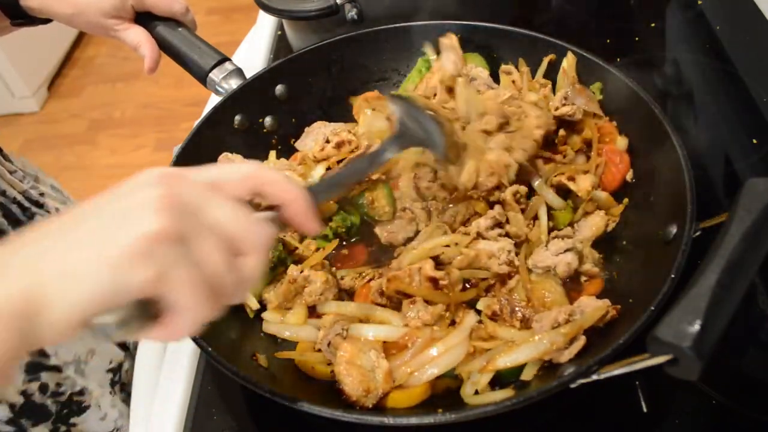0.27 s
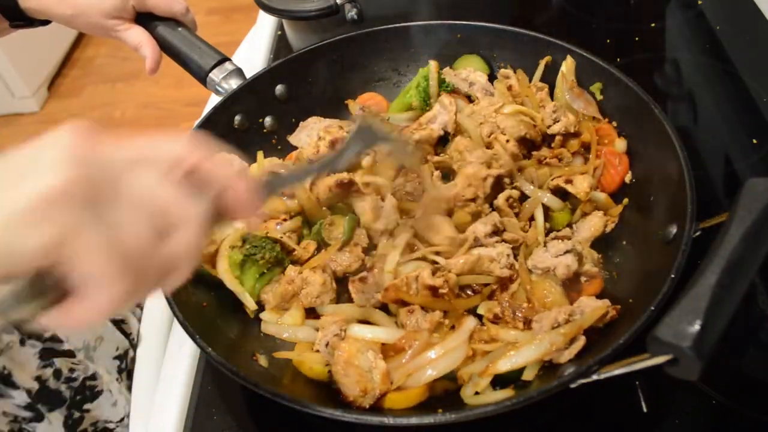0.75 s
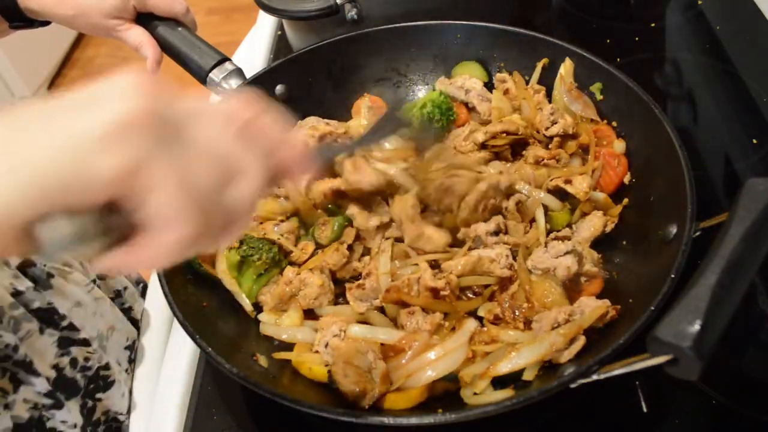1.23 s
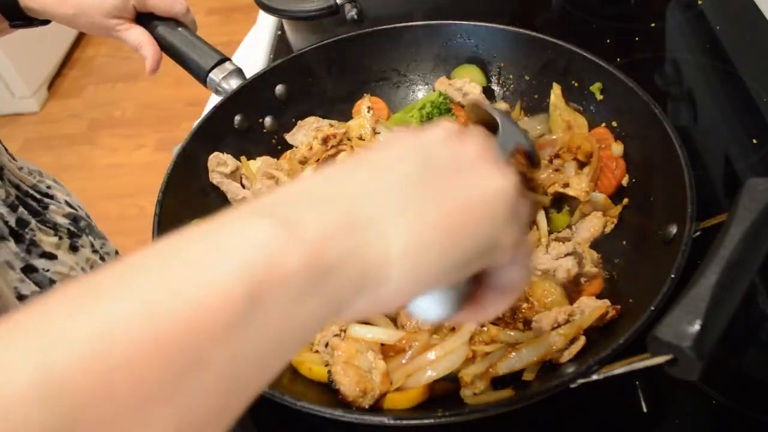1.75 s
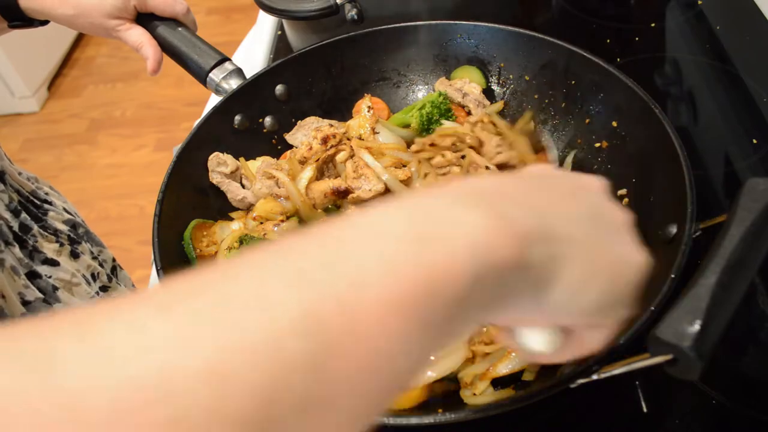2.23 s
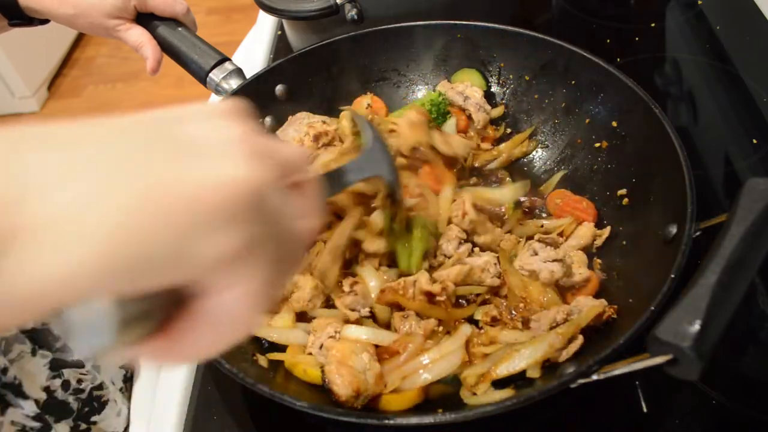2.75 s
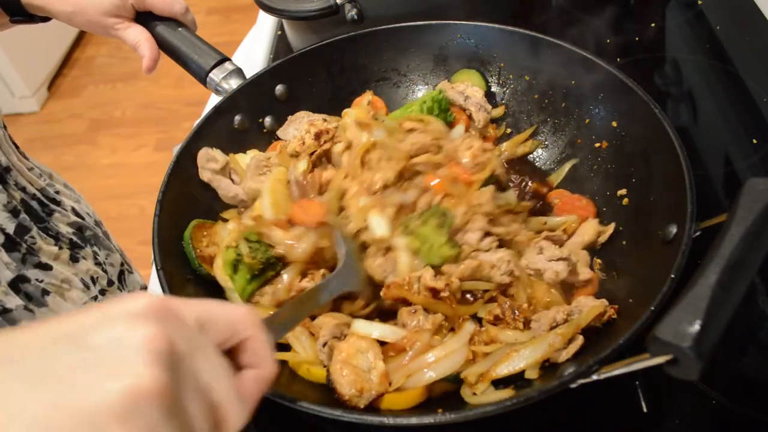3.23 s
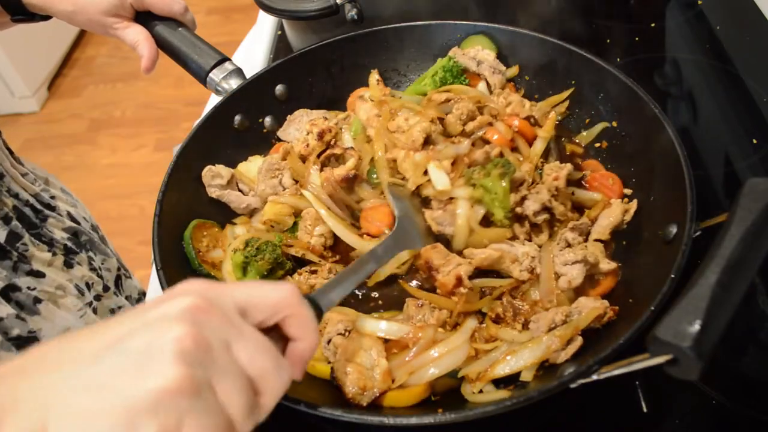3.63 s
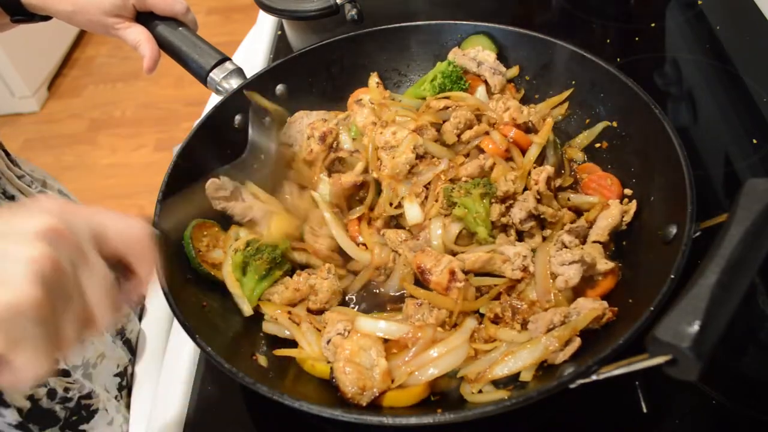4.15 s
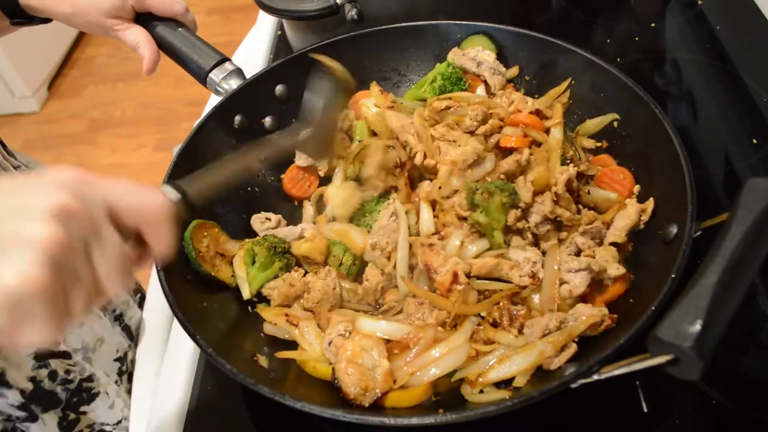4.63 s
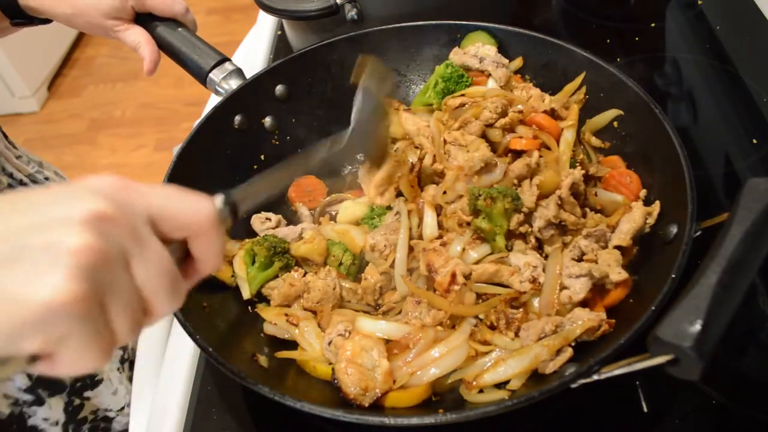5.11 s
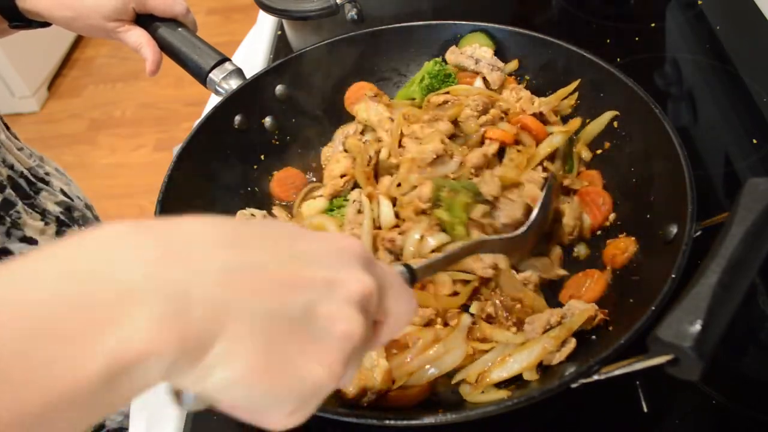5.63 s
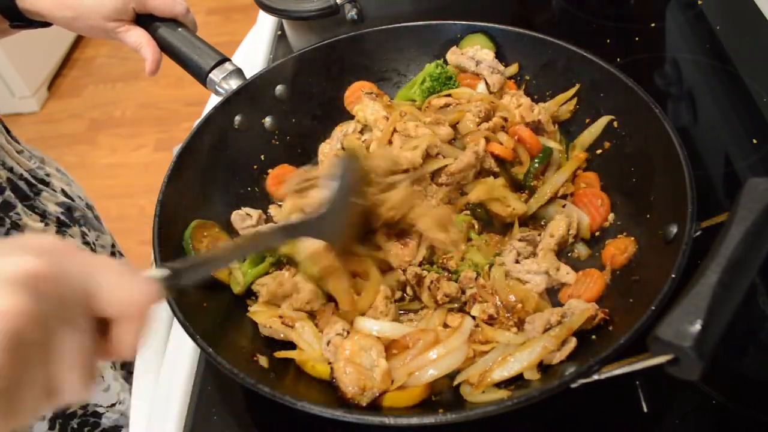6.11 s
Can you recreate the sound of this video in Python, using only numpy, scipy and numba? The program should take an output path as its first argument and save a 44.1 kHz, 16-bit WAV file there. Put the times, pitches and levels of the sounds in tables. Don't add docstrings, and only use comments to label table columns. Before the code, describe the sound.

Continuous moist frying sizzle, centred and near, full of tiny bubble bursts. First pops and a quick chirring train of steam puffs, then a metal clack joined to a short squealing, gritty scrape. Gentler bubbling returns before one piercing, short-ringing clank, followed by a quieter simmer with crisp spits, hissing puffs and soft pan thuds. Small room echo, low mains hum and light microphone hiss.

```python
import sys
import numpy as np
from scipy import signal
from scipy.fft import rfft, irfft, next_fast_len
from scipy.io import wavfile
from scipy.ndimage import uniform_filter1d
from numba import njit

SR = 44100
rng = np.random.default_rng(int(sys.argv[2]) if len(sys.argv) > 2 else 0)


def put_to_file(sound):
    columns = np.atleast_2d(sound).T
    safe = np.clip(columns, -1, 1)
    whole_steps = np.round(safe * 32767)
    wavfile.write(sys.argv[1], SR, whole_steps.astype(np.int16))


def attenuation_scalar(level_db):
    decades = np.asarray(level_db, float) / 20
    return 10 ** decades


N = 280917


def level(x, db):
    return x * attenuation_scalar(db) / np.sqrt(np.mean(x ** 2))


def curve(rows):
    s, *columns = np.transpose(rows)
    return [np.interp(np.arange(N) / SR, s, c) for c in columns]


def colour(x, points):
    hz, db = np.transpose(points)
    size = next_fast_len(len(x))
    f = np.maximum(np.arange(size // 2 + 1) * SR / size, 1)
    gain = attenuation_scalar(np.interp(np.log(f), np.log(hz), db))
    return irfft(rfft(x, size) * gain, size)[:len(x)]


def band(x, lo_hz, hi_hz):
    return signal.sosfilt(signal.butter(3, [lo_hz, hi_hz], "band", fs=SR, output="sos"), x)


def even_out(x, samples, floor=0.0):
    return x / np.sqrt(uniform_filter1d(x ** 2, size=samples) + floor)


def walk(rate):
    k = int(SR / rate)
    steps = np.repeat(rng.standard_normal(N // k + 1), k)
    return 1.3 * uniform_filter1d(uniform_filter1d(steps, k), k)[:N]


def mode(x, hz, t60):
    r = np.exp(-np.log(1000) / (t60 * SR))
    w = 2 * np.pi * hz / SR
    return signal.lfilter([1, -1], [1, -2 * r * np.cos(w), r * r], x) * np.cos(w / 2)


def resonate(x, peaks, widen, between_db, wander_db):
    outline = [(hz, db) for hz, _, db in peaks] + [(17000, peaks[-1][2] - 20)]
    between = level(colour(x, outline), between_db)
    sound = 0
    for hz, width_hz, db in peaks:
        push = x * attenuation_scalar(wander_db * walk(35)[:len(x)])
        ring = mode(push, hz, 2.2 / (widen * width_hz))
        sound = sound + level(ring, db) * np.sqrt(width_hz)
    return level(sound, 0) + between


@njit
def grains(count, start, step, cycles, size, glide):
    out = np.zeros(count)
    for g in range(len(start)):
        u, phase, i = 0., 0., int(start[g])
        while u < 8 and i < count:
            out[i] += size[g] * 2.72 * u * np.exp(-u) * np.sin(phase)
            phase += step[g] * (1 + glide * u)
            u += step[g] / (2 * cycles)
            i += 1
    return out


def bursts(table, cycles, trim_db, spray_db, snap_db=-2.0):
    s, db, hz = np.transpose(table)
    step, size = 2 * np.pi * hz / SR, attenuation_scalar(db + trim_db)
    ring = grains(N, s * SR, step, cycles, size, 0.0011)
    snap = grains(N, s * SR, 0.59 * step, cycles / 2.76, size * attenuation_scalar(snap_db), 0.08)
    out = ring + snap
    for _ in range(4):
        late, pitch = rng.random((2, len(s)))
        start = s * SR + (2 + 14 * late) * 2 * np.pi / step
        drop = size * attenuation_scalar(spray_db - 2.9 * late)
        out = out + grains(N, start, step * (.75 + .5 * pitch), cycles, drop, .01)
    return out


# start_s, heat_db, pooling [0-1]
HEAT = [(0.0, -1, 0.5), (0.3, -0.5, .3), (0.55, 3, 0.5), (0.8, -2, 0.3), (1.244, -2, 0.9), (1.97, 0, 0.5),
        (2.32, -0.5, 0.8), (2.8, -4, 0.9), (3.07, 0, 0.7), (3.3, 0.5, 0.57), (3.644, -2.5, 0.34),
        (4.05, -1.5, 0.6), (4.2, 1.5, 0), (4.4, -3, 0.75), (5.08, -11, 0.3), (5.3, -5.5, 0.9),
        (5.55, -4, 0.44), (6.37, -4, 0.66)]
# lowest_hz, highest_hz, rate [bursts per s], ring [cycles], size_spread_db, trim_db
BUBBLE_KINDS = [
    (4300, 10500, 1800, 2.0, 2.8, -2),
    (2300, 3900, 900, 3.0, 2.3, -1),
    (1250, 2400, 700, 2.5, 1.9, -1),
    (250, 900, 600, 2.5, 1.5, -3),
]
WHISTLE_BUBBLES = (6381, 7400, 1494, 2.5, 5, -4.5)
SPATTER_DROPS = (3800, 8200, 61, 2.5, -0.5, -8.5)
CHIRRING_VENTS = (2641, 3096, 258, 8, 3, -6.5)
# level_db, follow [dB per dB of heat], pooled_db
BOIL_RESPONSE = [
    (-51.5, 0.49, -1.5),
    (-48.5, 1.0, -3.5),
    (-56.5, 1.5, 8),
    (-55, 0.54, 2),
]


def simmer():
    heat, pool = curve(HEAT)
    fizz, vents, plops, thumps = [db + follow * heat + pooled_db * pool for db, follow, pooled_db in BOIL_RESPONSE]
    strengths = [fizz, vents, plops, thumps, fizz, fizz, vents]
    kinds = [*BUBBLE_KINDS, WHISTLE_BUBBLES, SPATTER_DROPS, CHIRRING_VENTS]
    out = 0
    for db, (lo_hz, hi_hz, rate, cycles, spread_db, trim_db) in zip(strengths, kinds):
        when, pitch, big = rng.random((3, int(rate * N / SR)))
        step = 2 * np.pi * lo_hz * (hi_hz / lo_hz) ** pitch / SR
        size = attenuation_scalar(-spread_db * np.log(1 - .995 * big))
        swarm = grains(N, when * N, step, float(cycles), size, 0.028)
        out = out + level(swarm, trim_db) * attenuation_scalar(db + walk(14))
    return out


# pitch_hz, level_db [rms]
MAINS = [(60, -57), (120, -66.5)]


def hum():
    t = np.arange(N) / SR
    return sum(np.sqrt(2) * attenuation_scalar(db + 0.43 * walk(2.81)) * np.sin(2 * np.pi * hz * t) for hz, db in MAINS)


# pitch_hz, level_db [per Hz]
AIR_TONE = [(15, -34), (25, -11), (59, -5.5), (195, -5), (384, -10), (427, -6.5), (607, -5.5), (962, -8),
            (2160, -13.5), (3920, -12.5), (10700, -19.5), (14400, -16), (16000, -19.5)]


def air():
    return level(colour(rng.standard_normal(N), AIR_TONE), -49.5)


def kitchen(x):
    t60_s, mid_db, side_db = 0.72, -24, -56
    t = np.arange(SR // 2) / SR
    fade = attenuation_scalar(-60 * t / t60_s) * np.clip((t - .004) / 0.0009, 0, 1)
    tails = rng.standard_normal((2, len(t))) * fade
    dull = signal.lfilter([.6], [1, -.4], tails)
    mid, side = (signal.fftconvolve(x, level(h, 0) / np.sqrt(len(t)))[:N] for h in dull)
    return attenuation_scalar(mid_db) * mid, attenuation_scalar(side_db) * side


# start_s, peak_db, pitch_hz
LOW_PLOPS = [(0.028, -28.5, 1730), (0.086, -27.5, 1190), (0.122, -31, 1670), (0.14, -31.5, 1220),
             (0.171, -32, 810), (0.304, -32, 1315), (0.502, -29, 1157), (0.95, -27, 2270),
             (1.395, -32.5, 1510), (1.604, -31, 1730), (2.766, -32, 1780), (2.785, -27, 1520),
             (2.881, -30.5, 1500), (2.918, -28.5, 1320), (2.964, -29, 1400), (2.998, -28.5, 1890),
             (3.072, -36, 1970), (3.145, -28, 1740), (3.551, -31.5, 1650), (3.61, -32.5, 1580),
             (3.645, -31.5, 1670), (3.728, -29, 1600), (3.758, -31, 1600), (3.839, -32, 1650),
             (3.892, -32.5, 2080), (3.962, -31, 1660), (6.205, -34.5, 950)]
# start_s, peak_db, pitch_hz
BRIGHT_POPS = [(0.0278, -29, 2850), (0.0861, -28, 2670), (0.1404, -26, 2970), (0.171, -30, 2900),
               (0.2536, -31.5, 3280), (0.3693, -32.5, 3050), (0.393, -28, 3850), (0.4322, -31, 2820),
               (0.5048, -31, 3100), (0.734, -28.5, 3050), (0.9364, -29, 2820), (0.9514, -19.5, 2460),
               (0.9564, -22, 3570), (0.9649, -21.5, 3070), (0.9784, -31, 3310), (1.2064, -22.5, 2800),
               (1.94, -31, 2900), (2.453, -42, 3200), (2.4776, -24.5, 3660), (2.821, -34, 2320),
               (2.863, -37, 3800), (3.013, -39, 2180), (3.047, -34, 2180), (4.0757, -18, 2430),
               (4.0792, -16.5, 1700), (4.0815, -11, 3880), (4.0875, -32, 1730), (4.093, -28, 4200),
               (2.8489, -26, 2680), (2.9642, -31, 2550), (3.1915, -31, 3240), (3.3865, -33, 2640),
               (3.4291, -32, 2760), (3.9787, -30, 3410), (5.441, -32.5, 2780), (5.5104, -29.5, 2760),
               (5.6446, -35, 3600), (5.884, -30.5, 3330), (6.058, -30.5, 3600), (6.2088, -31, 3700)]
# start_s, peak_db, pitch_hz
FAINT_BURSTS = [(0.2198, -37, 1750), (0.2532, -37, 740), (0.332, -36, 5140), (0.4568, -36, 1880),
                (0.6947, -38, 5510), (0.7431, -34, 4260), (0.8105, -32, 3010), (0.8334, -39.5, 1120),
                (0.9456, -28, 3240), (0.9461, -25, 7400), (0.9905, -36.5, 1000), (0.9955, -40, 1250),
                (1.0549, -44, 770), (1.1547, -40, 1000), (1.6321, -32, 4970), (2.4662, -48, 1370),
                (2.5685, -29.5, 3100), (2.6328, -36, 1260), (2.6987, -29, 1470), (2.9291, -33, 1510),
                (3.0259, -36, 1380), (3.0394, -38, 5890), (3.1072, -33, 1650), (3.1641, -33, 1500),
                (3.1761, -33, 1120), (3.2489, -33, 2760), (3.3128, -35, 1110), (3.3312, -29, 4160),
                (3.4465, -38.5, 1250), (3.4969, -38, 1630), (3.7857, -39, 1630), (3.8466, -45, 1000),
                (3.867, -42, 1130), (3.8999, -34, 2130), (3.9159, -35, 1640), (3.9433, -40, 1500),
                (4.4761, -27.5, 6510), (4.7989, -32, 5010), (4.8064, -28, 7520), (4.8263, -35, 2170),
                (4.9281, -38, 2880), (5.0693, -38, 4510), (5.3207, -39, 5300), (5.3706, -26, 5670),
                (5.5183, -41, 2260), (5.5267, -30, 2760), (5.5447, -29, 7140), (5.7852, -37, 1480),
                (5.8091, -27, 6600), (5.8854, -55, 1250), (5.9318, -29, 5060), (5.9857, -30, 4640),
                (5.9917, -38, 7890), (5.9967, -39, 4760), (6.0186, -33, 2760), (6.0341, -32, 5510),
                (6.1159, -31, 3510), (6.1518, -43, 1750), (6.2187, -27, 5170), (6.274, -43, 746)]
# start_s, peak_db, pitch_hz
FAT_SPITS = [(0.3217, -26, 5100), (0.6494, -26, 5300), (0.6825, -26, 6600), (0.7427, -40, 4280),
             (0.7662, -31, 6790), (0.9377, -22.5, 7160), (1.233, -24, 6950), (1.2989, -28, 7800),
             (1.4187, -33, 4500), (1.842, -27.5, 3960), (2.6217, -27, 6680), (2.7093, -26.5, 5160),
             (3.0572, -24.5, 4950), (3.177, -24.5, 6670), (3.305, -30, 7150), (3.4476, -28, 4820),
             (3.8716, -28, 6860)]
# start_s, peak_db, pitch_hz
CLEAR_BLIPS = [(2.47, -36.5, 1180), (2.627, -30.5, 1240), (2.637, -26, 4600), (2.9455, -33, 4700),
               (2.9485, -29, 4570), (2.694, -43, 1510), (4.125, -37, 940), (4.195, -41, 655),
               (5.456, -36, 2800), (5.468, -40, 2750), (5.484, -36, 2750), (5.501, -41, 2720),
               (5.535, -40, 2900), (4.21, -30, 3200), (4.228, -34, 3000), (4.248, -32, 2700),
               (4.315, -39, 3300), (4.056, -41, 1480)]
# start_s, peak_db, pitch_hz
TURNED_FOOD = [(4.2204, -24, 4700), (4.2577, -29, 3740), (4.28, -31, 3960), (4.3078, -26, 4500),
               (4.3707, -26, 6400), (4.542, -28, 5970), (4.7192, -21.5, 6700), (4.7943, -25.5, 4900),
               (4.909, -41, 4000), (5.184, -33, 4290), (5.5772, -28, 5110), (5.6454, -23, 5140),
               (5.675, -27.5, 3860), (5.7158, -27.5, 5270), (5.79, -28, 4720), (5.8202, -20, 6260),
               (5.8426, -26.5, 4730), (5.9268, -25, 4940), (5.9897, -25, 4960), (6.0566, -40, 3720),
               (6.191, -39.5, 4760), (6.2091, -27, 3800), (6.3008, -23.5, 5000)]


def pops_and_spits():
    out = bursts(LOW_PLOPS, 2.1, -3.0, -9.0, -1.5) + bursts(BRIGHT_POPS, 4.2, -1.0, -11.0, -6.5)
    out = out + bursts(FAINT_BURSTS, 3.1, -0.66, -10.5, -6) + bursts(CLEAR_BLIPS, 4.5, 0.1, -18, -18)
    return out + bursts(FAT_SPITS, 2.5, -3.0, -9.0) + bursts(TURNED_FOOD, 2.5, -3.0, -9.0)


# start_s, length_s, level_db, centre_hz, width_hz
STEAM_JETS = [
    (0.948, 0.05, -45.5, 5460, 6100),
    (4.23, 0.01, -53, 3500, 3000),
    (4.38, 0.0077, -49, 6020, 4000),
    (4.732, 0.025, -46, 5000, 4000),
    (4.808, 0.021, -45, 6250, 6000),
    (5.523, 0.05, -44, 1930, 2400),
    (5.524, 0.05, -50, 6500, 3020),
    (5.826, 0.012, -56, 6200, 2500),
    (6.22, 0.0078, -52.5, 4500, 5000),
]


def jets():
    t, out = np.arange(N) / SR, 0
    grit = rng.standard_normal(N) * attenuation_scalar(3.5 * walk(250))
    for s, length, db, hz, width_hz in STEAM_JETS:
        hiss = band(mode(grit, hz, 4.7 / width_hz), hz / 3, hz + width_hz)
        out = out + level(hiss, db) * np.exp(-((t - s) / length) ** 2)
    return out


# start_s, peak_db, pitch_hz
VENT_PUFFS = [(1.0071, -36, 2750), (1.0226, -32, 2820), (1.0364, -31, 3070), (1.0512, -28, 3080),
              (1.0638, -21, 3050), (1.0735, -22.5, 3000), (1.0824, -20.5, 3050), (1.091, -26, 3050),
              (1.103, -22, 2920), (1.1157, -24.5, 2870), (1.1297, -33, 3040), (1.1414, -37, 3090),
              (1.1555, -26.5, 2850), (1.1707, -28, 2740), (1.1882, -25, 2770), (1.223, -31, 2780),
              (1.2411, -30, 2850), (1.2593, -32, 2420), (1.2775, -27, 2540), (1.296, -33, 2480),
              (1.3144, -28.5, 2500), (1.3319, -30, 2770), (1.3498, -28.5, 2510), (1.3682, -26.5, 2750),
              (1.3887, -35, 2730), (1.41, -26.5, 2740), (1.4311, -34, 2550), (1.4516, -30, 2820),
              (1.4728, -35, 2760), (1.4928, -30, 2870), (1.513, -34, 2850), (1.5334, -30.5, 2760),
              (1.554, -31, 2810), (1.5753, -35, 2860), (1.5967, -32, 2760), (1.6157, -36, 3100),
              (1.636, -31, 2840), (1.6547, -32, 2740), (1.674, -30, 2880), (1.691, -27.5, 2700),
              (1.712, -30, 2840), (1.7315, -41, 3020), (1.752, -35, 2400), (1.7795, -35, 3040),
              (1.8113, -48, 2770)]


def vent():
    lag_s = .0009
    return bursts(np.add(VENT_PUFFS, [lag_s, 0, 0]), 3.2, 0.54, -20, -12)


# start_s, peak_db, pitch_hz
PAN_THUMPS = [(1.509, -40, 648), (1.99, -35, 310), (4.348, -37.5, 608), (4.769, -40.5, 670),
              (5.001, -36.5, 576), (5.363, -31.5, 585), (5.365, -38, 960), (5.832, -44, 620),
              (6.056, -41, 612)]
# start_s, peak_db, pitch_hz
BURNER_BUMPS = [
    (1.499, -49, 104),
    (1.987, -38.5, 118),
    (4.076, -46, 131),
    (5, -52, 124),
    (5.366, -44, 124),
]


def thumps():
    return bursts(PAN_THUMPS, 3.2, 0.0, -7.5) + bursts(BURNER_BUMPS, 4.9, 0.0, -30)


# start_s, knock_db, crack_db, crack_ms, ring_db, tilt [dB per octave]
SPOON_BLOWS = [
    (1.9875, -10, -9, 5.5, -30, 1.5),
    (4.0722, 7, -12, 5, -37, -14),
]
# pitch_hz, width_hz, level_db
SPOON_MODES = [(895, 370, -12.5), (1606, 380, 3.5), (2130, 1020, 5), (2780, 290, 5), (3500, 620, 2.5),
               (3890, 87, -11), (4880, 310, -1), (5700, 830, -1), (8550, 370, -17), (8780, 230, -4),
               (12050, 380, 6)]
# pitch_hz, level_db [per Hz]
CRACK_TONE = [(290, -49), (500, -29), (2850, 1.5), (5550, 1), (6700, 1), (9090, -8.5), (16000, -21)]
# pitch_hz, width_hz, level_db
PAN_RING = [(1720, 47, 4.5), (2180, 60, -4), (2760, 73, 3), (3240, 66, -6), (3900, 37, 10.5), (4770, 60, 3),
            (5100, 36, -16), (5660, 80, -3), (6260, 110, 5), (6700, 100, 3.5), (7600, 25, -7),
            (8700, 75, 4), (9550, 27, -36)]


def blows():
    out, size = np.zeros(N + SR), SR // 2
    t = np.arange(size) / SR
    contacts = [(.0002, 0.44), (.00045, -0.46), (.0011, 0.28)]  # (delay s, push)
    push = sum(g * np.exp(-((t - late) / .00003) ** 2) for late, g in contacts)
    for s, knock_db, crack_db, crack_ms, ring_db, tilt_db in SPOON_BLOWS:
        knock = 0
        for k, (hz, width_hz, db) in enumerate(SPOON_MODES):
            knock = knock + (-1) ** k * attenuation_scalar(db) * mode(push, hz, 2.2 / width_hz)
        tilt = [(300, -3 * tilt_db), (19200, 3 * tilt_db)]
        rattle = even_out(colour(colour(rng.standard_normal(size), CRACK_TONE), tilt), 60)
        crack = rattle * np.exp(-t * 1000 / crack_ms) * np.clip((t - .0003) / .0003, 0, 1)
        ring = resonate(rng.standard_normal(size), PAN_RING, 3.0, 7.0, 2.5) * attenuation_scalar(ring_db - 60 * t / 0.37)
        blow = attenuation_scalar(knock_db) * knock / np.abs(knock).max() + attenuation_scalar(crack_db) * crack + ring
        start = int(s * SR)
        out[start:start + size] += band(blow, 760, 16500)
    return out[:N]


# start_s, length_s, pitch_hz, level_db
WALL_SQUEALS = [(1.998, 0.0096, 2430, -20), (2.02, 0.014, 6300, -30), (2.045, 0.023, 2920, -26.5),
                (2.047, .012, 4230, -21), (2.054, 0.011, 6200, -19), (2.063, .014, 3870, -19),
                (2.082, 0.022, 4290, -15.5), (2.088, 0.034, 4960, -26), (2.105, 0.022, 6800, -33),
                (2.128, 0.018, 4470, -14.5), (2.13, .018, 3920, -19), (2.143, 0.019, 2545, -19.5),
                (2.152, 0.0083, 3800, -17.5), (2.166, .014, 2326, -22), (2.201, 0.012, 1438, -31.5),
                (2.23, 0.0081, 2220, -30), (2.053, 0.014, 1600, -28.5), (2.08, .012, 4770, -23),
                (2.095, .02, 5780, -29), (2.12, .015, 5180, -26), (2.168, 0.021, 1283, -33.5),
                (2.135, .02, 8400, -33)]


def squeals(t):
    width_hz = 45
    out = 0
    for s, length, hz, db in WALL_SQUEALS:
        ring = band(mode(rng.standard_normal(len(t)), hz, 2.2 / width_hz), hz * .8, hz * 1.25)
        out = out + even_out(ring, 500, 1e-9) * attenuation_scalar(db) * np.exp(-((t - s) / length) ** 2)
    return out


# start_s, pressure_db, depth [0 near the rim - 1 near the base]
SCRAPE_STROKE = [
    (1.995, -13.5, 0.64),
    (2.015, -19.5, 0.95),
    (2.045, -10.5, 0.55),
    (2.082, -12, 0.037),
    (2.105, -10.5, 0.29),
    (2.13, -14, 0.34),
    (2.16, -14.5, 0.71),
    (2.2, -25.5, 1),
    (2.228, -23.5, 1),
]
# pitch_hz, width_hz, level_db
WALL_MODES = [(565, 25, -4.5), (860, 36, -6.5), (1395, 43, -9), (1600, 38, -6.5), (2080, 23, -17),
              (2460, 97, 4.5), (2795, 16, 3), (3400, 71, -7.5), (3915, 74, -0.5), (4390, 210, 3),
              (5000, 78, -0.5), (5870, 99, -1.5), (6500, 160, 5), (6950, 200, 2.5), (7770, 270, 0),
              (8340, 69, -11), (8100, 28, 12), (9700, 48, -34), (10300, 46, -50)]
# lowest_hz, highest_hz
MODE_FAMILIES = [
    (3600, 5550),
    (1980, 3200),
    (5550, 13000),
    (1050, 1980),
    (400, 1050),
]
# rim_db, base_db, piling [dB per s as food piles on the wall]
FAMILY_REACH = [
    (0, -9, 4),
    (-16, -2.5, -5),
    (-11.5, -19.5, 17),
    (-29.5, -13.5, 31),
    (-25.5, -13, -33),
]
# pitch_hz, level_db [per Hz]
GRIT_TONE = [(7000, -10), (9500, 3), (12000, -2), (16000, -9)]
# start_s, jolt_db
EDGE_CATCHES = [(2.022, 4), (2.036, 3), (2.0422, 8), (2.0507, -3), (2.058, 7), (2.0615, 9), (2.0663, 5),
                (2.071, 3), (2.081, 4), (2.088, 4), (2.0908, 3), (2.1041, 3), (2.1149, 4), (2.1246, 6),
                (2.129, 5), (2.1409, 8), (2.1538, 6), (2.16, 11), (2.1769, 6), (2.189, 2), (2.2239, 5)]


def scrape():
    lift_s, lift_db, dying_db_per_s = .025, -12.5, 120
    catch_s, grit_db, grit_deep_db = 0.0012, -32, -12
    on = slice(int(1.98 * SR), int(2.36 * SR))
    t = np.arange(N)[on] / SR
    slips = (rng.standard_normal(N) * attenuation_scalar(2.0 * walk(450)))[on]
    wall = resonate(slips, WALL_MODES, 1.5, -14.0, 6.5)
    pressure, depth = (c[on] for c in curve(SCRAPE_STROKE))
    after = np.maximum(t - SCRAPE_STROKE[-1][0], 0)
    pressure = pressure + lift_db * np.minimum(after / lift_s, 1) - dying_db_per_s * after
    fade = np.clip((t - 1.988) / .008, 0, 1) * np.clip((2.35 - t) / .04, 0, 1)
    body = 0
    for (rim_db, base_db, piling), (lo_hz, hi_hz) in zip(FAMILY_REACH, MODE_FAMILIES):
        db = pressure + rim_db + (base_db - rim_db) * depth + piling * (t - SCRAPE_STROKE[0][0])
        family = even_out(band(wall, lo_hz, hi_hz), 900, 1e-9)
        body = body + family * attenuation_scalar(db) * fade
    rasp_db = pressure - SCRAPE_STROKE[0][1] + grit_db + grit_deep_db * depth
    rasp = level(band(colour(slips, GRIT_TONE), 6500, 16000), 0) * attenuation_scalar(rasp_db)
    rasp = rasp * (t > SPOON_BLOWS[0][0])
    jolt_db = sum(db * np.exp(-((t - s) / catch_s) ** 2) for s, db in EDGE_CATCHES)
    out = np.zeros(N)
    out[on] = (body * attenuation_scalar(-1.0) + squeals(t) + rasp) * attenuation_scalar(0.43 * jolt_db - 1.8)
    return out


def scene():
    wok = simmer() + pops_and_spits() + jets() + vent() + thumps() + blows() + scrape()
    echo, side = kitchen(wok)
    mid = wok + echo + hum() + air()
    return np.array([mid + side, mid - side])


# pitch_hz, level_db [per Hz]
CAPSULE_TONE = [(18, -31), (30, 2), (780, -3), (1670, -6), (2230, -4.5), (2980, -2.5), (3400, -2.5),
                (4910, -5), (14800, -5.5), (16000, -11)]


def capsule_hiss():
    hiss = level(colour(rng.standard_normal(N), CAPSULE_TONE), -57.5)
    return np.array([hiss, -hiss])


def roll_off(x):
    return signal.sosfilt(signal.butter(12, 15830, fs=SR, output="sos"), x)


def record(dry):
    mix = np.clip(dry + capsule_hiss(), -1, 1)
    return roll_off(mix)


dry = scene()
out = record(dry)
put_to_file(out)
```